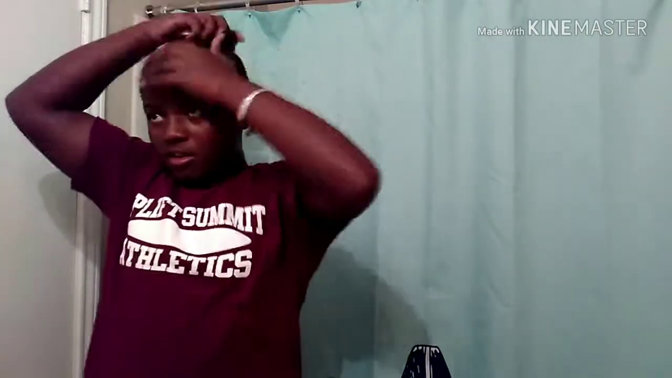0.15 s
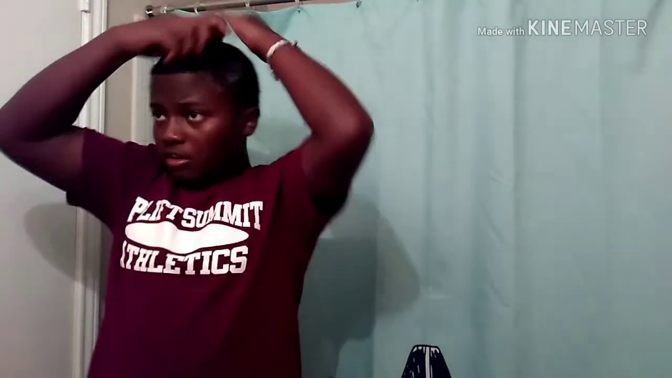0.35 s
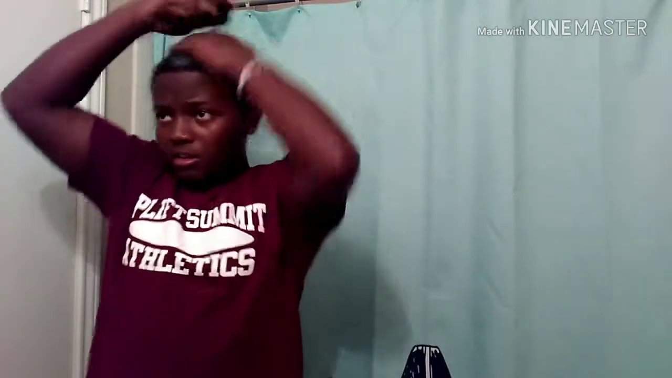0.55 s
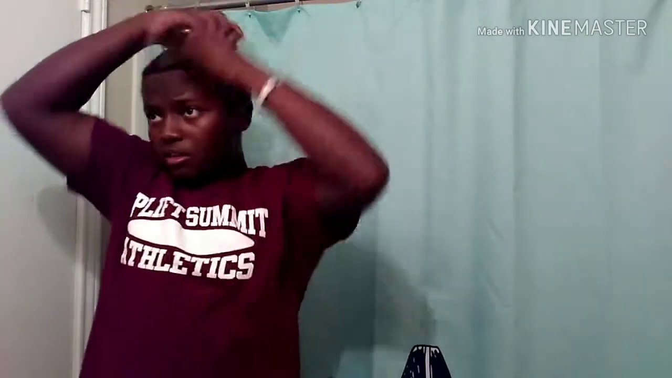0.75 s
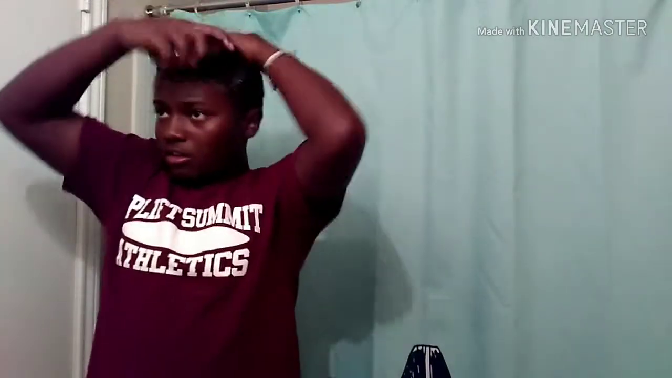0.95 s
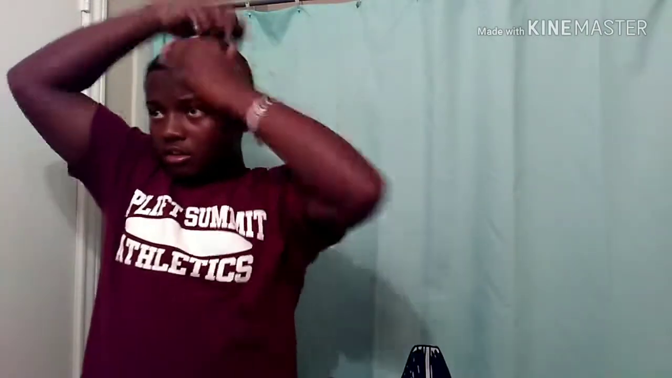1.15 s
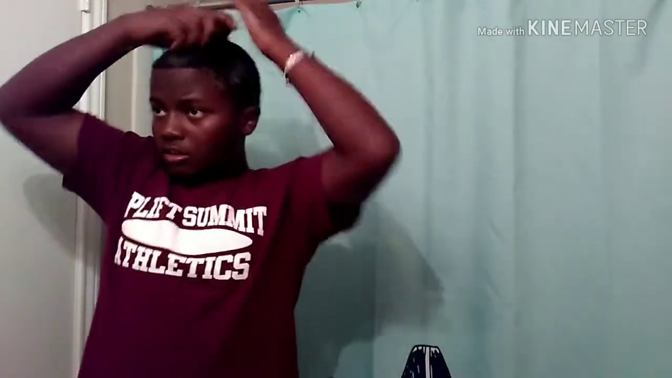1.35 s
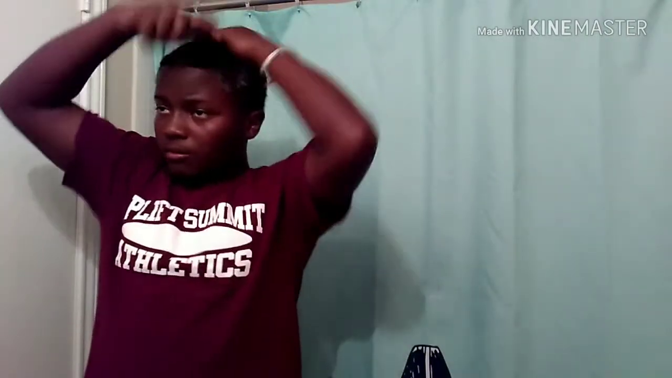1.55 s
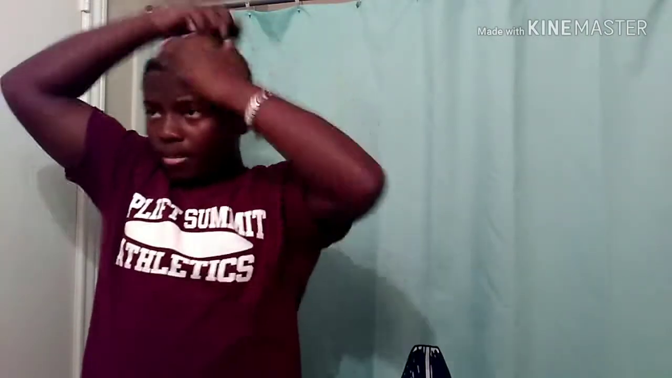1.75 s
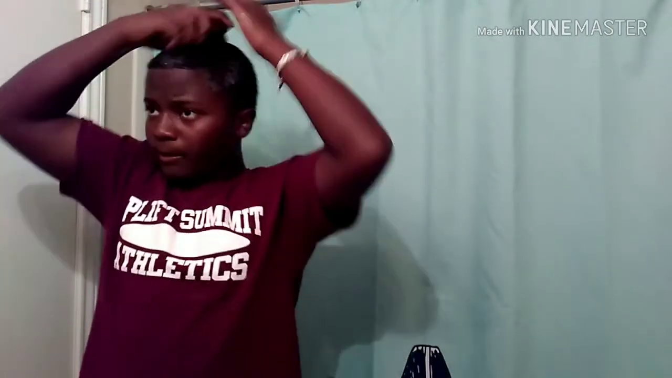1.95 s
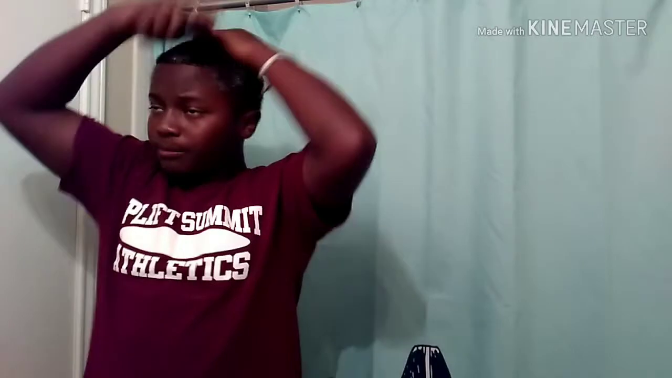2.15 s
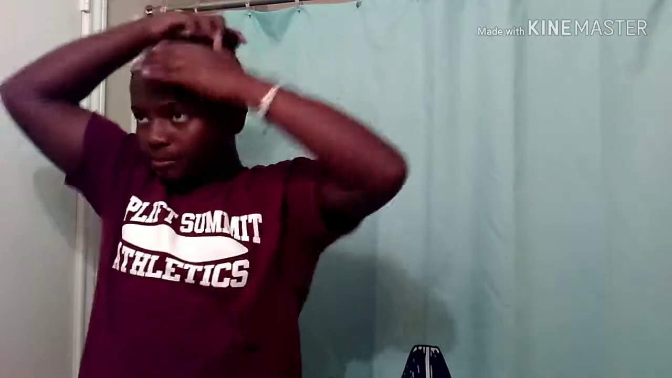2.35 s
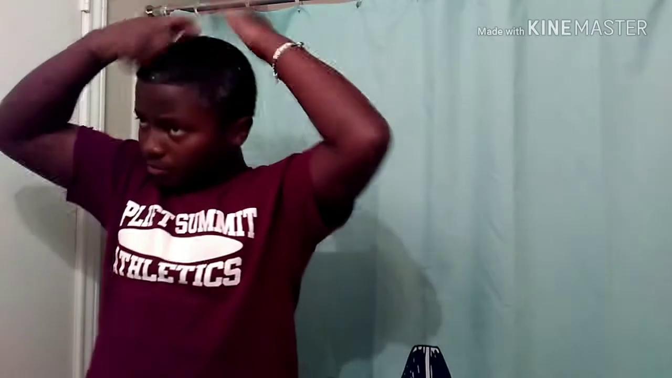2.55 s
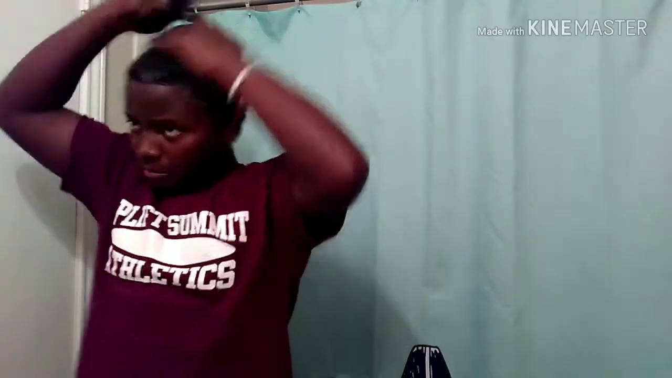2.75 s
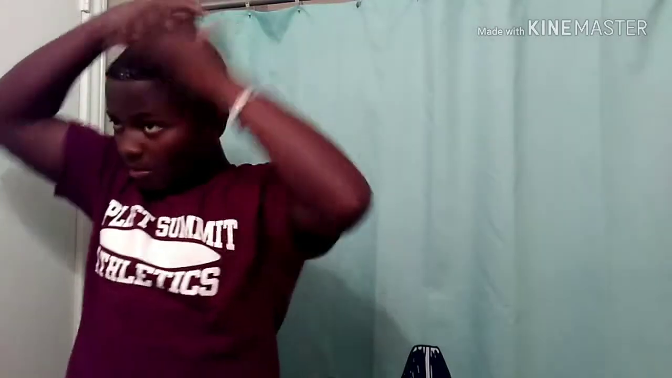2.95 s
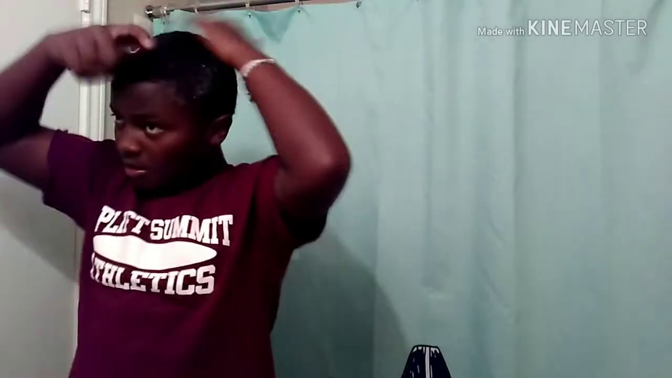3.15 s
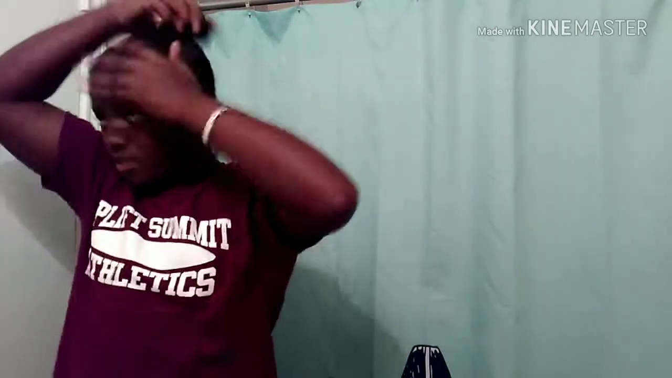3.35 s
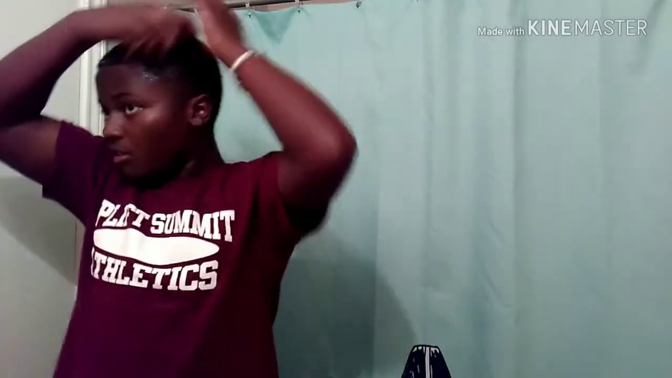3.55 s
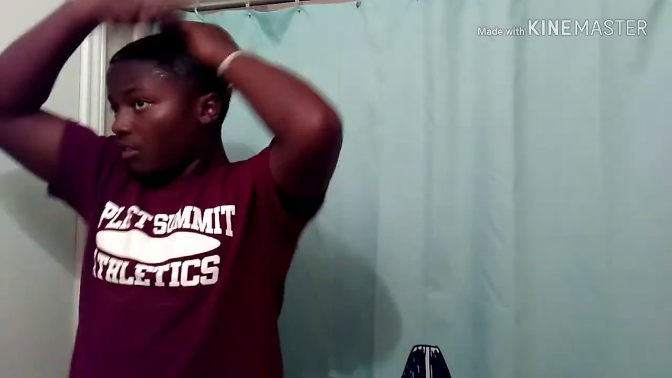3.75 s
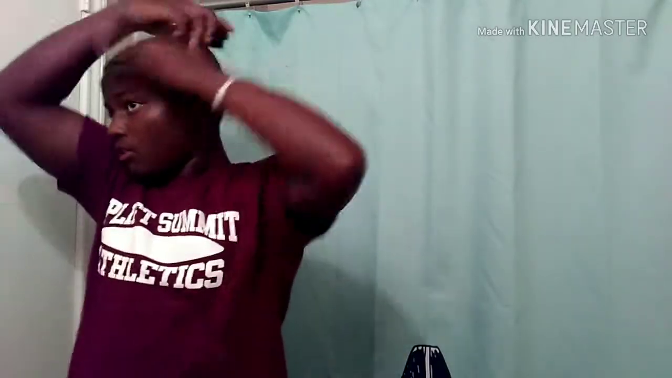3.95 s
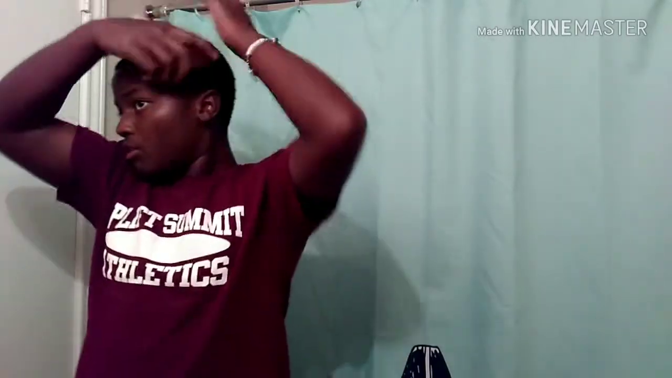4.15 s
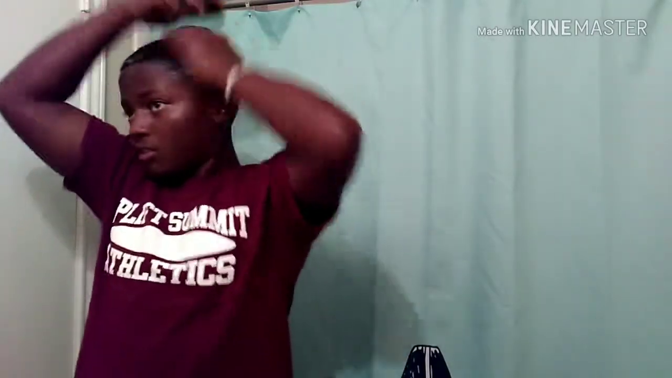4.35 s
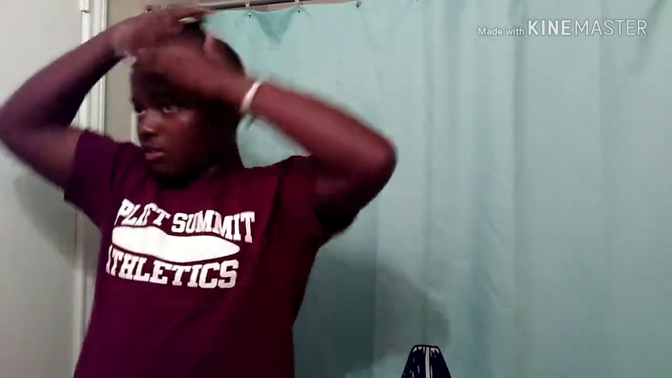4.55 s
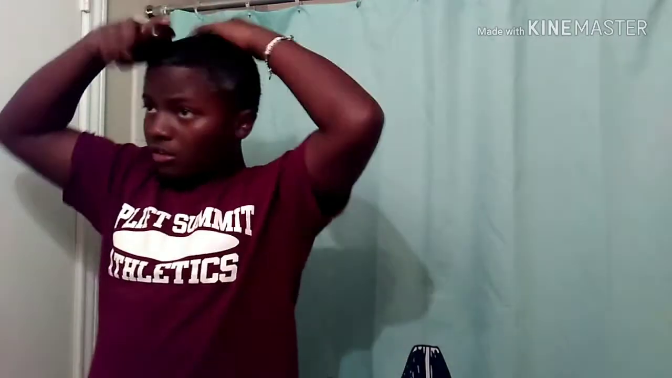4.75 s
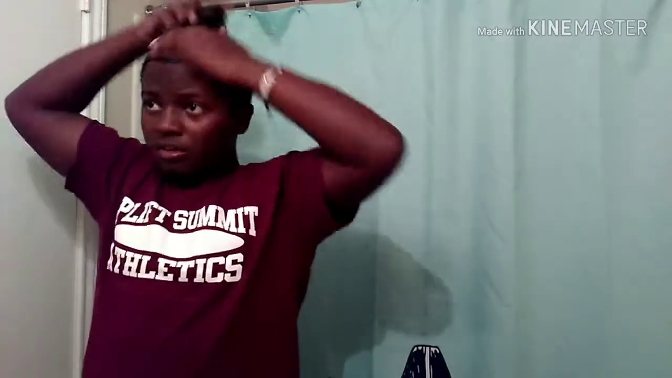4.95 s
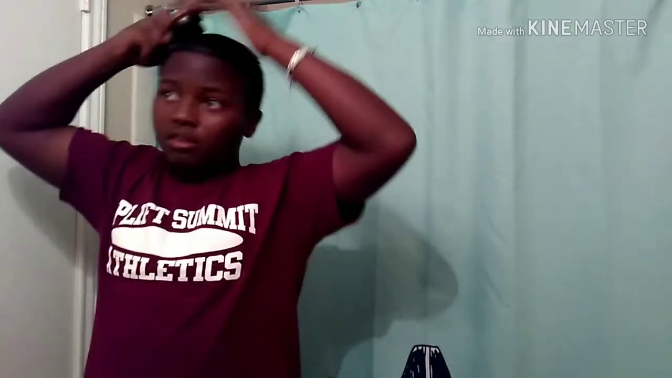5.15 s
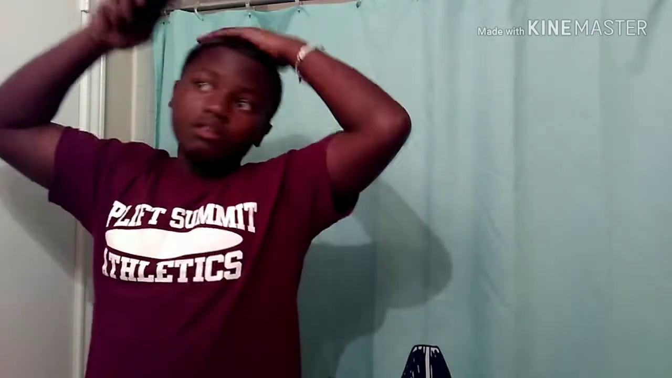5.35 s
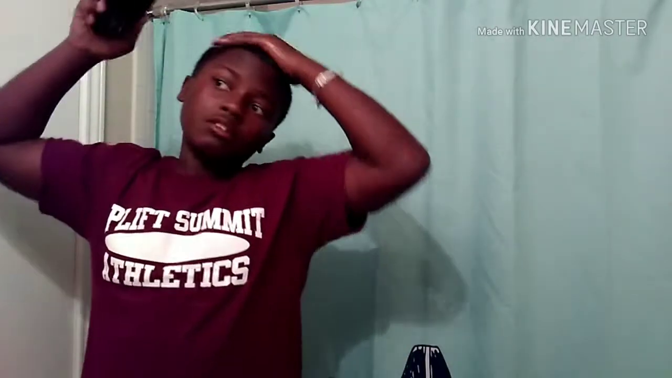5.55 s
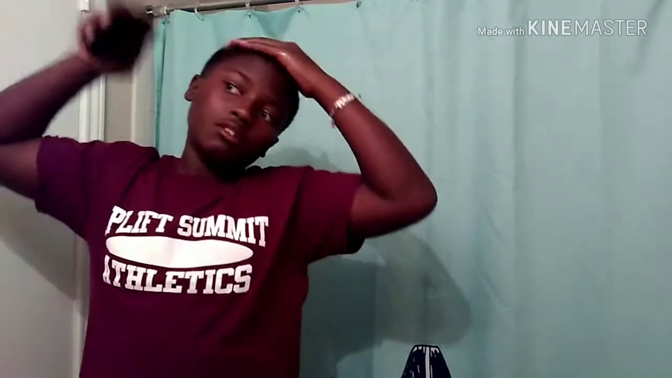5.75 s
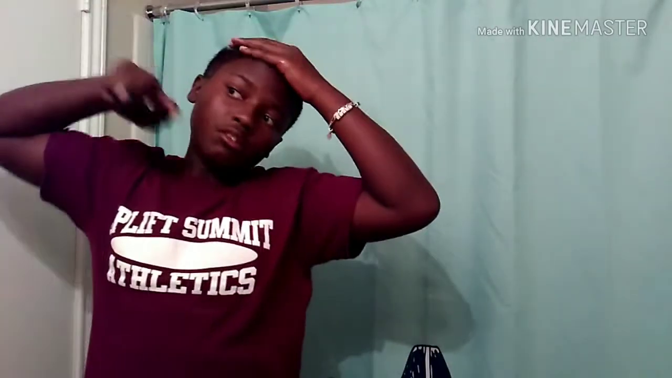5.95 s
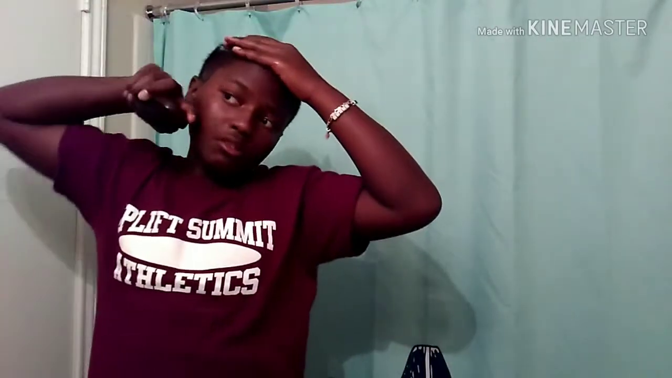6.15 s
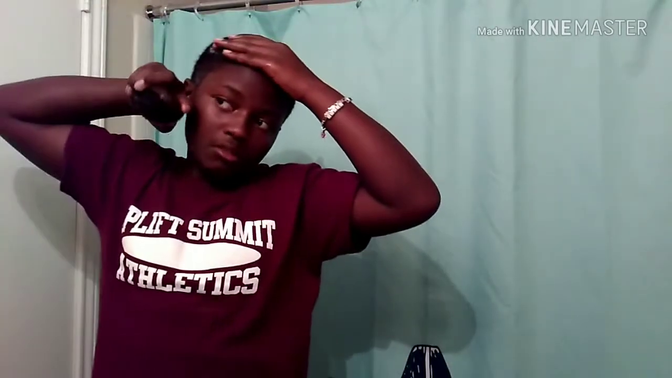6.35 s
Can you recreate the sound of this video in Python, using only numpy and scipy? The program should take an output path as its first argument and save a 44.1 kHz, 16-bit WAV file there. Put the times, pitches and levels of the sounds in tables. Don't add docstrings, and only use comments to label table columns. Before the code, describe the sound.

A stiff brush scratches briskly over short wet hair in a small tiled bathroom, softer palm swishes between strokes, over a faint low fan hum.

```python
import sys
import numpy as np
from scipy import signal
from scipy.fft import rfft, irfft, next_fast_len
from scipy.io import wavfile
from scipy.ndimage import uniform_filter1d, map_coordinates

SR = 44100
rng = np.random.default_rng(int(sys.argv[2]) if len(sys.argv) > 2 else 0)


def volts(x):
    e = np.asarray(x, float) / 20
    return 10 ** e


def log_audio(samples):
    frames = np.atleast_2d(samples).T
    limited = np.clip(frames, -1, 1)
    pcm = np.round(limited * 32767).astype(np.int16)
    wavfile.write(sys.argv[1], SR, pcm)


N = 281602


def rms_one(x):
    return x / np.sqrt(np.mean(x ** 2) + 1e-20)


def in_time(rows):
    s, *columns = np.transpose(rows)
    return [np.interp(np.arange(N) / SR, s, column) for column in columns]


def colour(x, points):
    hz, level_db = np.transpose(points)
    size = next_fast_len(N + 4096)
    grid_hz = np.fft.rfftfreq(size, 1 / SR) + 1
    gain = volts(np.interp(np.log(grid_hz), np.log(hz), level_db))
    return irfft(rfft(x, size) * gain, size)[..., :N]


def resonate(x, hz, width_hz):
    r = np.exp(-np.pi * width_hz / SR)
    top = np.array([1, 0, -1]) * (1 - r * r) / 2
    return signal.lfilter(top, [1, -2 * r * np.cos(2 * np.pi * hz / SR), r * r], x)


def drift(rate_hz):
    knots = rng.standard_normal(420)
    return map_coordinates(knots, [np.arange(N) / SR * rate_hz + 5], order=3)


# lands_s, full_weight_s, lifts_s, fizz_db, extra_pressure_db
BRUSH_STROKES = [(0.26, 0.45, 0.63, -38, 0.3), (0.779, 0.933, 1.182, -38.6, 0),
                 (1.325, 1.395, 1.734, -40, -0.5), (1.44, 1.55, 1.723, -41.5, 1),
                 (1.869, 1.99, 2.332, -39, -0.5), (2.428, 2.582, 2.833, -38.5, -0.3),
                 (2.966, 3.118, 3.336, -38, -0.86), (3.455, 3.603, 3.831, -39, 0),
                 (3.985, 4.11, 4.366, -41, -0.3), (4.544, 4.65, 4.896, -40, -0.5),
                 (4.68, 4.8, 4.97, -45, -1.5), (5.107, 5.235, 5.42, -38, -1.4),
                 (5.37, 5.415, 5.564, -66.5, -10), (5.535, 5.59, 5.83, -60, -8.5),
                 (5.6, 5.77, 5.945, -64, -17)]
# lands_s, full_weight_s, lifts_s, fizz_db, extra_pressure_db
PALM_STROKES = [(-0.1, -0.007, 0.19, -48, -1.6), (0.038, 0.155, 0.36, -43.5, -0.9),
                (0.481, 0.687, 0.89, -45, -2.3), (1.027, 1.221, 1.351, -46.5, 0.3),
                (1.614, 1.753, 1.925, -46.5, 0.2), (2.106, 2.352, 2.515, -46, -5),
                (2.734, 2.883, 3.017, -46.5, -1.5), (3.218, 3.386, 3.482, -45.5, 1),
                (3.75, 3.97, 4.047, -51, 0.9), (4.335, 4.51, 4.57, -50.5, 0.5), (4.89, 5.07, 5.23, -50, -1)]
# rise_power, fall_power, below_fizz_db
BRUSH_TOUCH = [
    (0.85, 2.33, 0),
    (1.3, 2.33, -12.5),
    (2.8, 2.8, -28),
]
# rise_power, fall_power, below_fizz_db
PALM_TOUCH = [
    (1.8, 0.78, 0),
    (3.4, 1.2, -11.5),
    (2.1, 0.87, -32),
]
REST_DB = [
    -94,
    -100,
    -105,
]


def contact():
    firm_db = -40
    growth = np.c_[[1, 1.21, 1.05]]
    pressing = np.c_[[0, 1, 2.7]]
    t = np.arange(N) / SR
    power = volts(2 * np.c_[REST_DB]) * np.ones(N)
    for strokes, touch in ((BRUSH_STROKES, BRUSH_TOUCH), (PALM_STROKES, PALM_TOUCH)):
        rise, fall, under_db = np.transpose(touch)[..., None]
        for lands, full, lifts, fizz_db, press_db in strokes:
            on = (t > lands) & (t < lifts)
            weight = np.sin(np.pi / 2 * np.interp(t[on], [lands, full, lifts], [0, 1, 0]))
            swell = weight ** np.where(t[on] < full, rise, fall)
            peak_db = firm_db + under_db + (fizz_db - firm_db) * growth + press_db * pressing
            power[:, on] += (volts(peak_db) * swell) ** 2
    return 10 * np.log10(power)


def slips():
    slips_per_s, spread_db = 16000, 1.5
    strength = volts(spread_db * np.minimum(rng.exponential(1, (2, N)), 4))
    direction = rng.choice([-1, 1], (2, N))
    return strength * direction * (rng.random((2, N)) < slips_per_s / SR)


def bathroom(level_db):
    t60_s, tiles_db = 0.16, -11.5
    keep = volts(-120 / (t60_s * SR))
    direct = volts(2 * level_db)
    held = signal.lfilter([1 - keep], [1, -keep], direct)
    share = volts(2 * tiles_db)
    return np.sqrt((direct + share * held) / (1 + share))


# hz, level_db
TIP_FIZZ = [(1500, -55), (3000, -21), (4500, -6), (6000, -2.5), (8000, 0), (11000, 1.5), (16000, -2.5)]
# hz, level_db
SCALP_SCRAPE = [(600, -59), (900, -40.5), (1300, -27.5), (1600, -5.5), (1900, 0), (2800, -1.5), (4000, 1),
                (5500, -3.5), (8000, -4), (12000, -32.5)]
# hz, level_db
PAD_DRAG = [(500, -58), (800, -39.5), (1050, -8.5), (1300, -3.5), (1500, 6), (1800, -12.5), (2300, -31.5),
            (4000, -55.5)]


def brush():
    fizz_db, scrape_db, drag_db = contact()
    light_db = -51
    far_db = -0.2 + 0.51 * np.clip(fizz_db - light_db, -14, 0)
    fizz = rms_one(colour(slips(), TIP_FIZZ)) * bathroom(fizz_db + 1.2 * drift(25) - 1.0)
    scrape = rms_one(colour(slips(), SCALP_SCRAPE)) * bathroom(scrape_db + 0.8 * drift(25) + 6.5)
    drag = rms_one(colour(slips(), PAD_DRAG)) * bathroom(drag_db + 1.9 * drift(20) + 6.0)
    return (fizz + scrape + drag) * [np.ones(N), volts(far_db)]


# peak_hz, width_hz, lift_db
NEAR_PORT = (10666, 1670, 10.78)
# peak_hz, width_hz, lift_db
FAR_PORT = (5600, 2760, 7.13)
# hz, level_db
FAR_SHADOW = [(1000, -5), (3000, -5), (6000, -8), (8500, -8.5), (11000, -11.5), (13000, -13.5),
              (16000, -13.5)]


def ports(x):
    heard = []
    for side, port in ((x[0], NEAR_PORT), (colour(x[1], FAR_SHADOW), FAR_PORT)):
        hz, width_hz, lift_db = port
        heard.append(side + (volts(lift_db) - 1) * resonate(side, hz, width_hz))
    return np.array(heard)


# peak_s, length_s, left_db
LOW_SHELF_NUDGES = [
    (0.457, 0.013, -44),
    (1.635, 0.031, -63),
    (2.247, 0.032, -68),
    (3.371, 0.027, -59),
    (3.609, 0.042, -59),
    (5.336, 0.019, -59),
    (5.382, 0.045, -66),
    (6.24, 0.064, -66.5),
    (6.319, 0.046, -70.5),
]
# peak_s, length_s, left_db
HIGH_SHELF_NUDGES = [(1.215, 0.052, -66), (1.295, 0.023, -55.5), (1.46, 0.019, -59), (1.774, 0.069, -62.5),
                     (2.019, 0.018, -51.5), (2.25, 0.066, -55.5), (2.713, 0.058, -66.5),
                     (3.372, 0.027, -56), (3.586, 0.041, -46), (5.143, 0.033, -53.5), (5.36, 0.056, -48.5),
                     (5.42, 0.07, -65.5), (5.481, 0.025, -53.5), (5.53, 0.09, -62), (5.583, 0.054, -55.5),
                     (6.255, 0.022, -61.5)]
# peak_s, length_s, left_db
BACK_NUDGES = [
    (0.395, 0.13, -77.5),
    (0.42, 0.014, -72),
]
# peak_s, length_s, left_db
LOW_BACK_NUDGES = [
    (0.317, 0.063, -73.5),
    (1.573, 0.033, -71),
]
# peak_s, length_s, left_db
MID_SHELL_NUDGES = [
    (0.388, 0.011, -57.5),
    (1.418, 0.031, -65),
]
# peak_s, length_s, left_db
LOW_SHELL_NUDGES = [
    (0.176, 0.03, -70),
    (0.267, 0.027, -70),
    (3.223, 0.02, -73),
    (3.273, 0.016, -67.5),
]
# peak_s, length_s, left_db
SHELL_NUDGES = [
    (0.168, 0.02, -68),
    (0.973, 0.054, -60),
    (1.583, 0.1, -68),
    (2.017, 0.047, -56.5),
    (3.171, 0.03, -64),
    (3.351, 0.019, -68),
]
# peak_s, length_s, left_db
HIGH_SHELL_NUDGES = [
    (1.554, 0.14, -57.5),
    (4.99, 0.073, -64.5),
    (5.083, 0.095, -74),
    (5.78, 0.055, -76),
    (5.905, 0.073, -79),
    (5.938, 0.017, -77),
]


def nudges():
    detune = 0.015
    modes = (                                    # pitch_hz, right_minus_left_db, nudges
        (264, -21, LOW_SHELF_NUDGES), (325, -23, HIGH_SHELF_NUDGES),
        (605, 16.2, BACK_NUDGES), (510, 9, LOW_BACK_NUDGES), (850, -26, MID_SHELL_NUDGES),
        (635, -18.5, LOW_SHELL_NUDGES), (1075, -23, SHELL_NUDGES), (1205, -17, HIGH_SHELL_NUDGES))
    out, t = np.zeros((2, N)), np.arange(N) / SR
    wobble, shake = 1.1 * drift(40), volts(2.5 * drift(50))
    for hz, right_db, rows in modes:
        chances = rng.uniform(-np.pi, np.pi, (len(rows), 3))
        for (start, length, left_db), (*phase, off) in zip(rows, chances):
            near = np.abs(t - start) < 2 * length
            since = t[near] - start
            swell = np.exp(-2.4 * (since / length) ** 2) * shake[near]
            pitch_hz = hz * (1 + detune * off / np.pi)
            wave = np.sin(2 * np.pi * pitch_hz * since + wobble[near] + np.c_[phase])
            out[:, near] += volts(left_db + np.array([[0], [right_db]]) - 3.5) * swell * wave
    return out


def opposed_noise():
    share = 0.89
    shared, *own = rng.standard_normal((3, N))
    return np.sqrt(share) * shared * [[1], [-1]] + np.sqrt(1 - share) * np.array(own)


# hz, level_db
SHELF_RUMBLE = [(20, -11), (55, 1), (90, 0.5), (170, -1), (260, -8), (420, 0), (560, -15.5), (900, -26.5),
                (1400, -52)]
# pitch_hz, width_hz, left_db, right_db
FAN_TONES = [
    (58, 11, -80, -84),
    (118, 12, -67, -65),
    (257.5, 39, -76, -91),
    (325.2, 11, -80.5, -100),
]
# time_s, level_db
RUMBLE = [(0, -70), (1, -72), (2, -71.5), (3, -71), (3.7, -71.5), (3.85, -76.5), (4.1, -68.5),
          (4.35, -77.5), (4.6, -71), (5.3, -73), (5.45, -76), (6.39, -79.5)]


def fan_in_shelf():
    out = rms_one(colour(opposed_noise(), SHELF_RUMBLE)) * volts(2.8 * drift(4))
    for hz, width_hz, left_db, right_db in FAN_TONES:
        tone = resonate(resonate(opposed_noise(), hz, width_hz), hz, 2 * width_hz)
        out += rms_one(tone) * volts(np.array([[left_db], [right_db]]) + 70)
    return out * volts(in_time(RUMBLE)[0])


# hz, level_db
SELF_NOISE = [(300, 10.5), (1000, 7), (1500, 0.5), (3000, -0.5), (6000, -9), (12000, -8), (12700, -11),
              (13000, -22), (16000, -25)]


def microphone_hiss():
    level_db = -81.5 + 0.7 * (in_time(RUMBLE)[0] + 74.5)
    return volts(level_db) * rms_one(colour(rng.standard_normal((2, N)), SELF_NOISE))


# hz, level_db
STARVED = [(1100, -32), (1500, -25), (2200, -20), (4000, -19.5), (7000, -19), (10000, -22.5), (13000, -27),
           (15500, -29)]
# hz, level_over_step_db
FINENESS = [(200, 8), (500, -3), (900, -5), (1600, 2), (2600, -5.5), (5200, -5.5), (7600, 0), (10300, 9),
            (13000, 4), (15000, -4)]


def thin_out(sound, hiss):
    frame, frame_start = 1024, 645
    wander_db, patch_db = 5.5, 3.2
    n, k = np.arange(2 * frame) + 0.5, np.arange(frame) + 0.5
    window = np.sin(np.pi * n / (2 * frame))[:, None]
    lapped = window * np.cos(np.pi / frame * np.outer(n + frame / 2, k)) * np.sqrt(2 / frame)
    lead, frames = 2 * frame - frame_start, N // frame + 3
    edges = np.unique(np.r_[0:160:4, 160:320:6, 320:730:10])
    widths, hz = np.diff(np.r_[edges, frame]), (edges + 2) * SR / (2 * frame)

    def lines(x):
        padded = np.pad(x, ((0, 0), (lead, 4 * frame)))
        blocks = padded[:, :(frames + 1) * frame].reshape(2, -1, frame)
        return np.concatenate([blocks[:, :-1], blocks[:, 1:]], axis=2) @ lapped

    def by_band(c):
        return np.add.reduceat(c ** 2, edges, axis=2) / widths

    def spread(v):
        return np.repeat(v, widths, axis=-1)

    def chance(power, size):
        return rms_one(uniform_filter1d(rng.standard_normal(power.shape), size=size, axis=1))

    cells, treble = lines(sound), hz > 1050
    floor = lines(hiss)
    floor_power = by_band(floor)
    power = uniform_filter1d(by_band(cells), size=2, axis=1)
    loudest = power[..., treble].max(axis=(0, 2))[:, None]
    limit_db = np.interp(hz, *np.transpose(STARVED)) + wander_db * chance(power, 3)
    kept = ~treble | (power > loudest * volts(2 * limit_db))
    beside = uniform_filter1d(power * kept, size=3, axis=2)
    hidden = np.where(hz < 4500, beside > 30 * floor_power, power > 2 * floor_power)
    shown = kept | ~hidden
    patches = volts(patch_db * chance(power, 4) * (hz > 600) * (hz < 9000))
    cells = cells * spread(kept * patches) + floor
    fineness_db = np.interp(hz, *np.transpose(FINENESS))
    step = spread(np.sqrt(by_band(cells)) / volts(fineness_db)) + 1e-12
    cells = spread(shown) * np.sign(cells) * np.floor(np.abs(cells) / step + 0.45) * step
    halves = (cells @ lapped.T).reshape(2, frames, 2, frame)
    joined = (halves[:, 1:, 0] + halves[:, :-1, 1]).reshape(2, -1)
    return joined[:, lead - frame:lead - frame + N]


def scene():
    return ports(brush()) + nudges() + fan_in_shelf()


def top_cut(x):
    return signal.sosfilt(signal.butter(12, 15530, fs=SR, output="sos"), x)


def record(dry):
    cutoff_hz = 15500
    cut = colour(dry, [(cutoff_hz - 20, 0), (cutoff_hz + 20, -90)])
    mix = thin_out(cut, microphone_hiss())
    return top_cut(mix)


dry = scene()
out = record(dry)
log_audio(out)
```